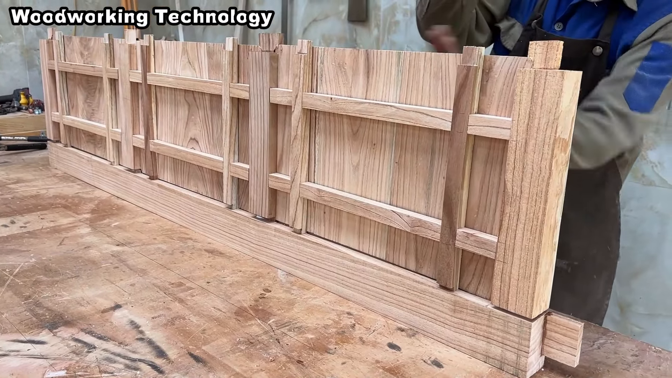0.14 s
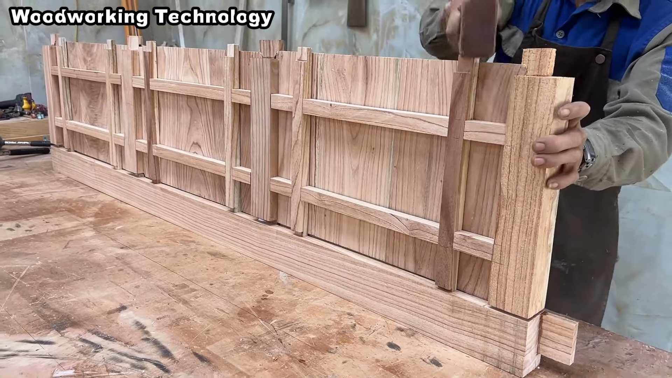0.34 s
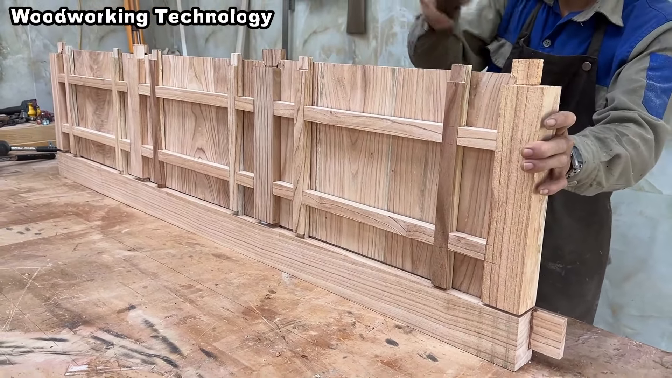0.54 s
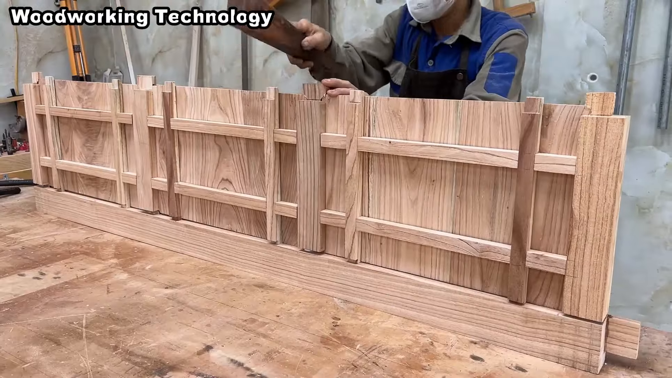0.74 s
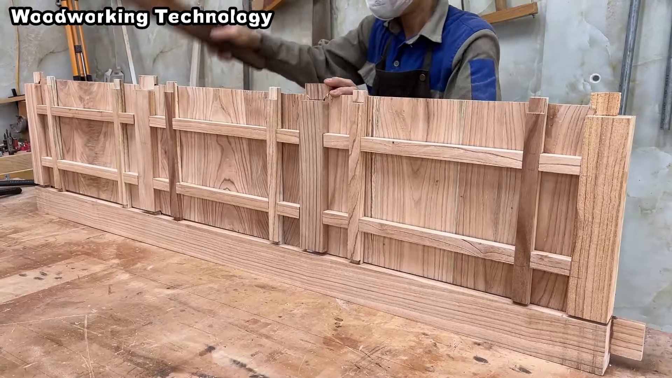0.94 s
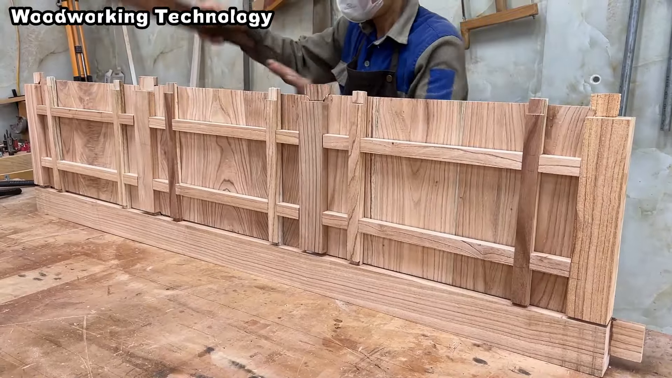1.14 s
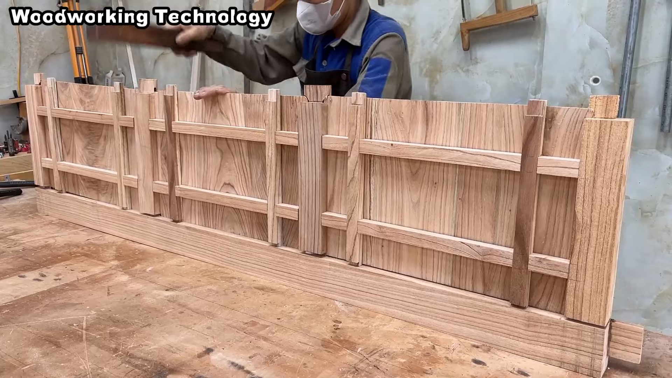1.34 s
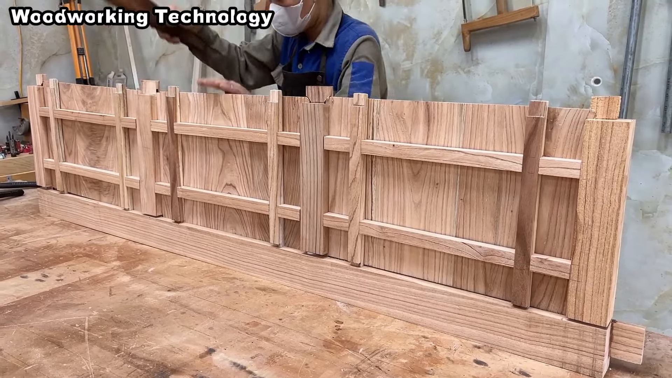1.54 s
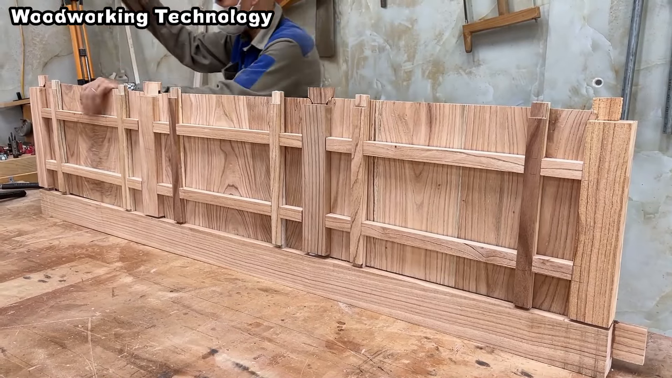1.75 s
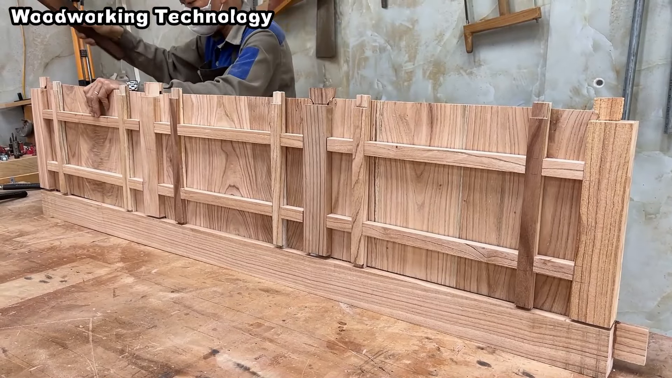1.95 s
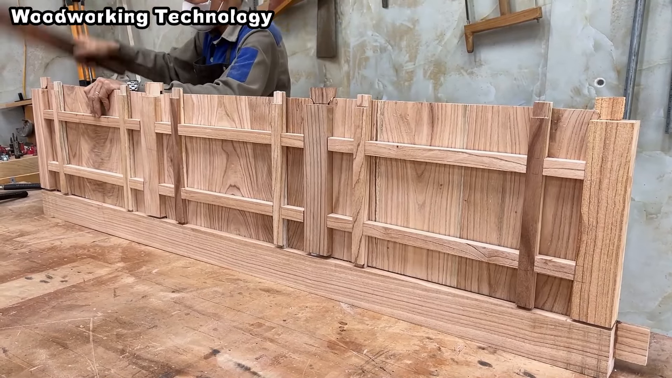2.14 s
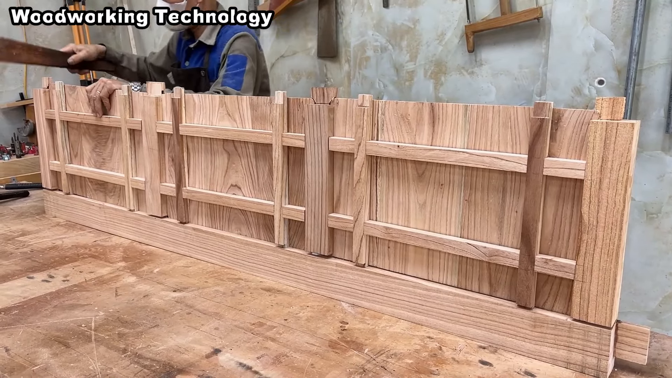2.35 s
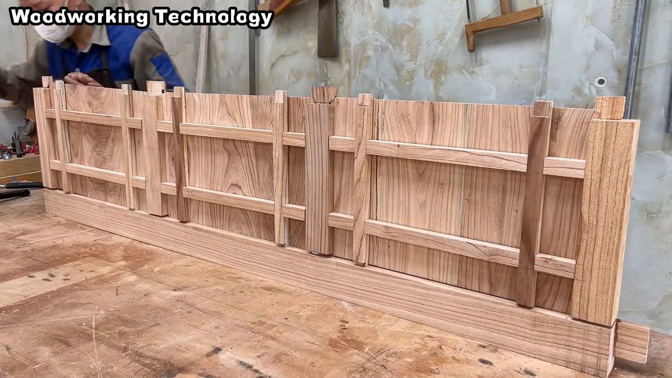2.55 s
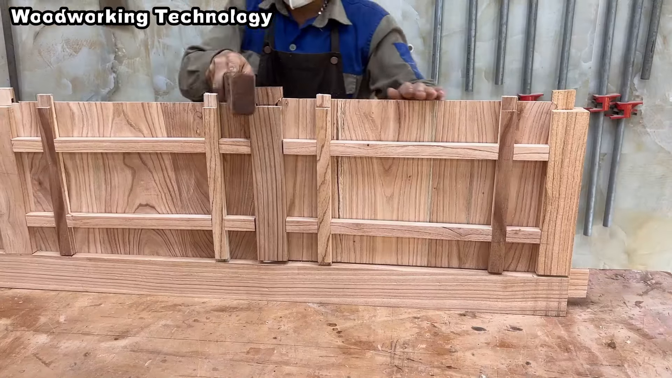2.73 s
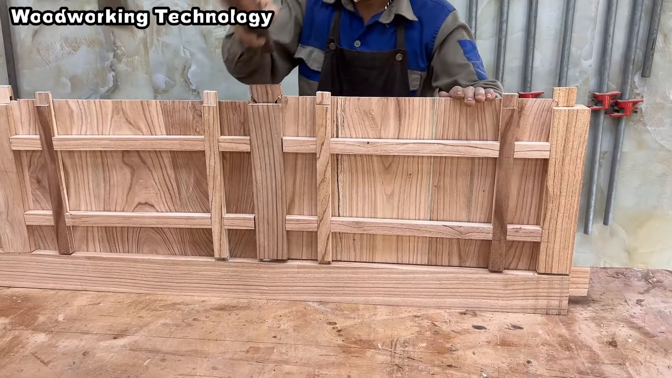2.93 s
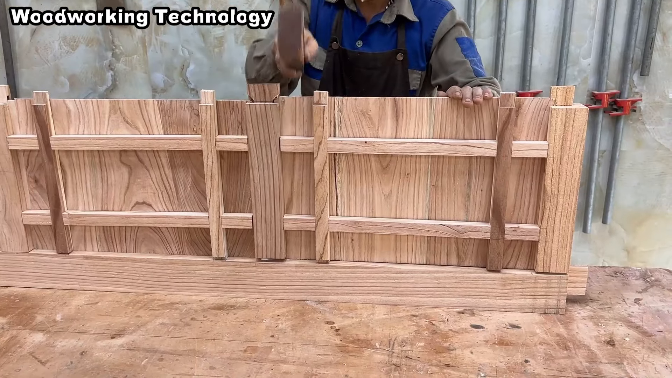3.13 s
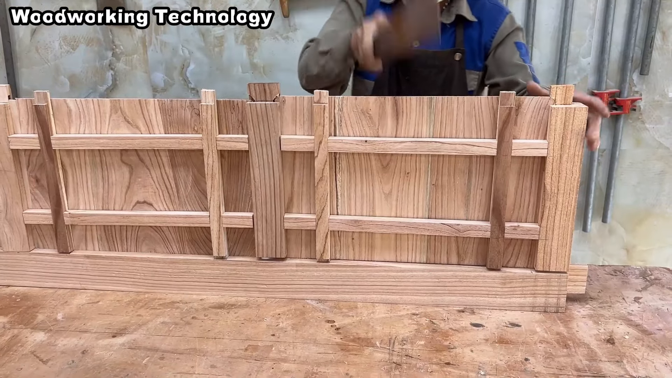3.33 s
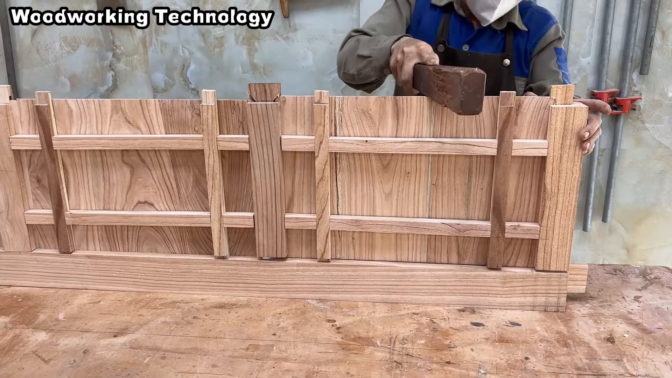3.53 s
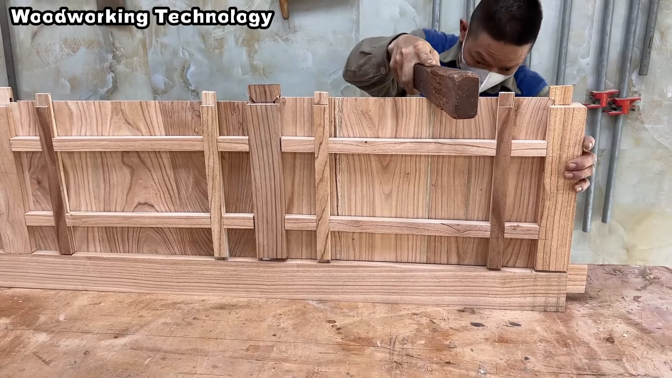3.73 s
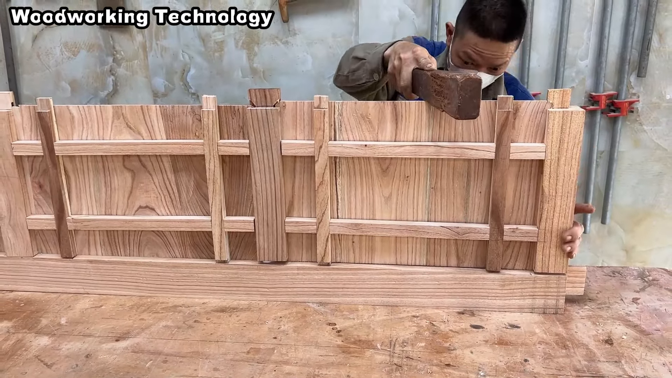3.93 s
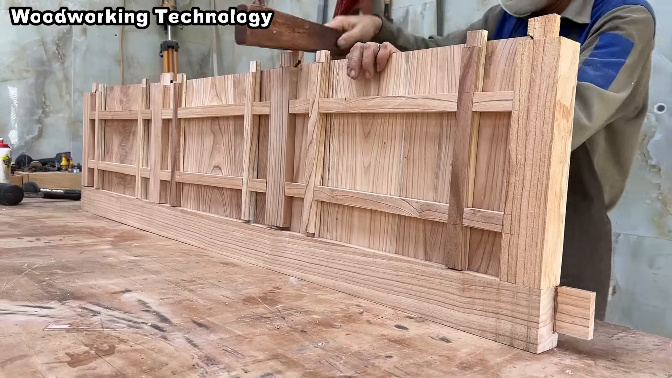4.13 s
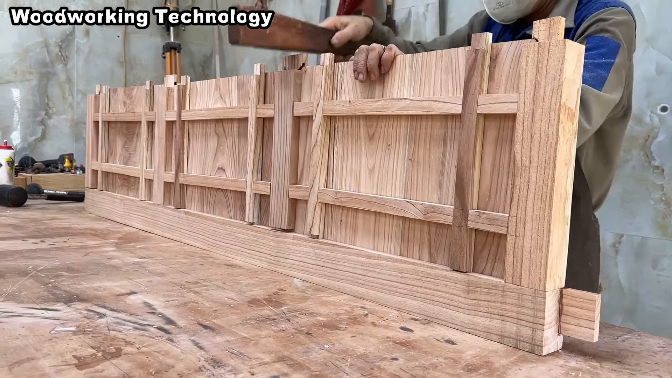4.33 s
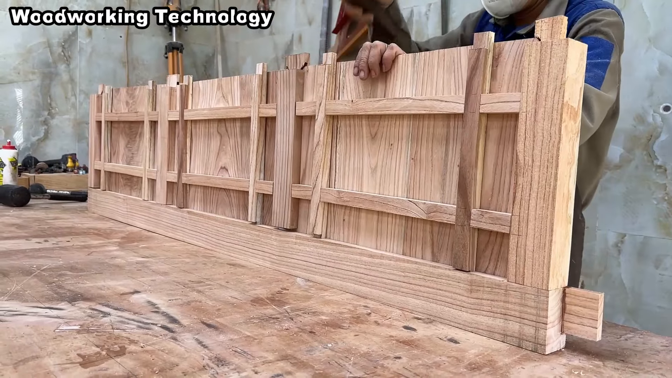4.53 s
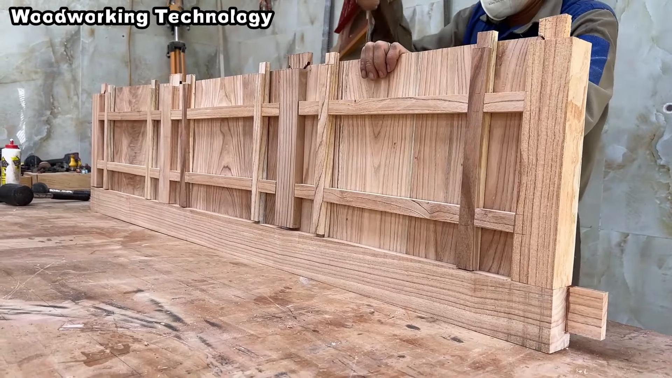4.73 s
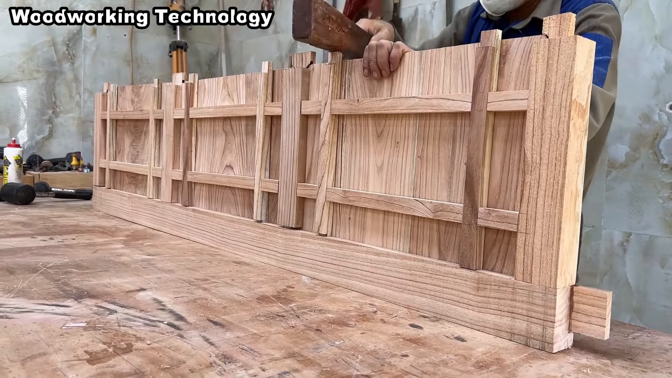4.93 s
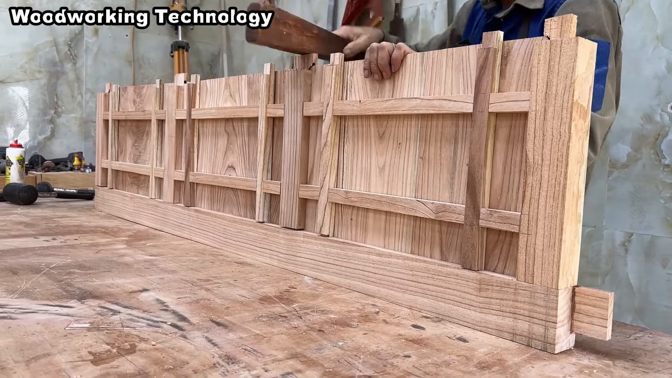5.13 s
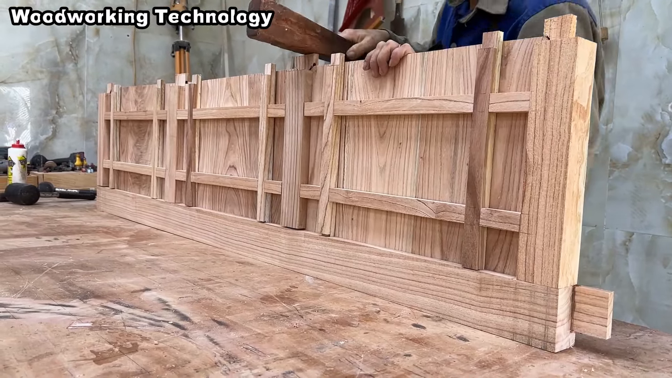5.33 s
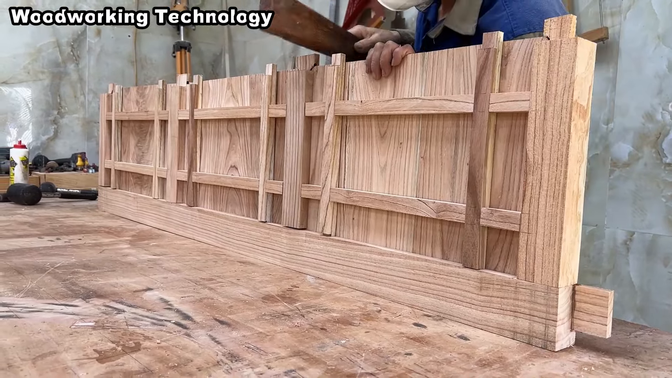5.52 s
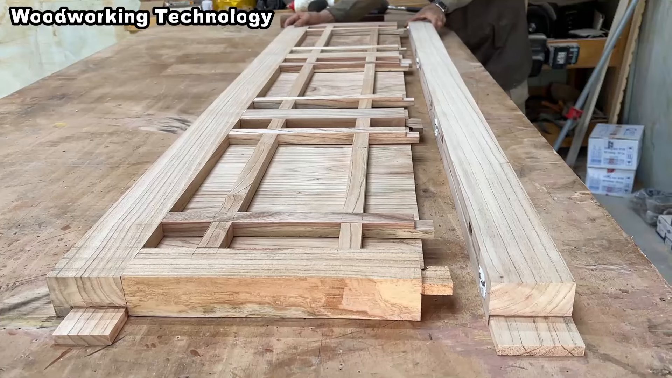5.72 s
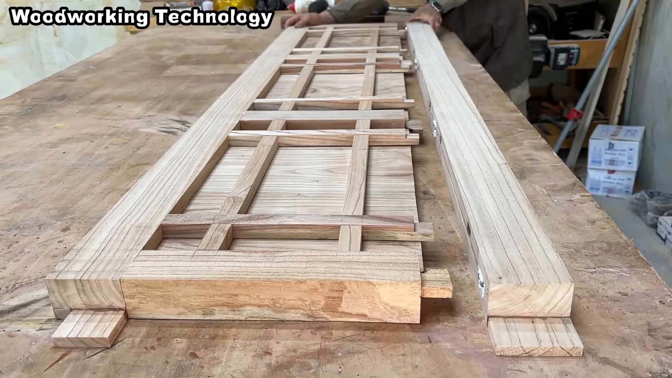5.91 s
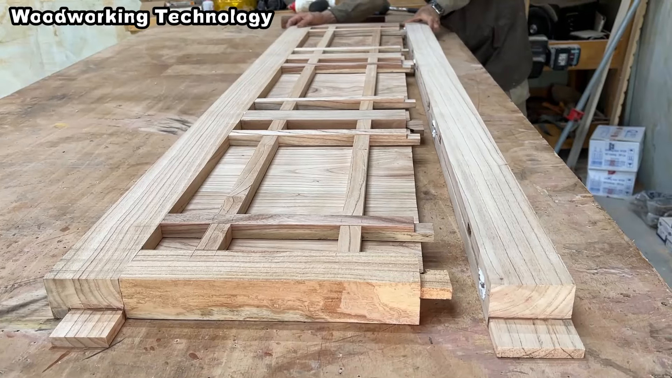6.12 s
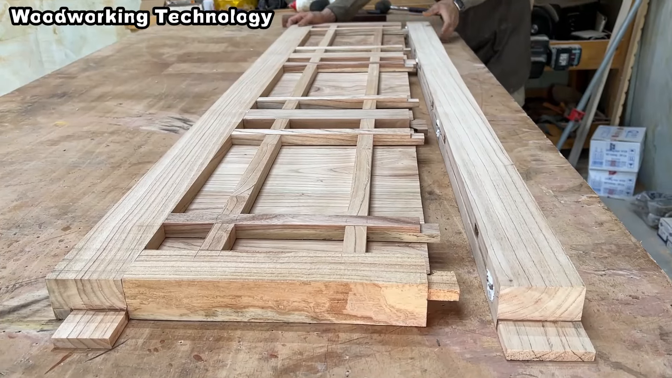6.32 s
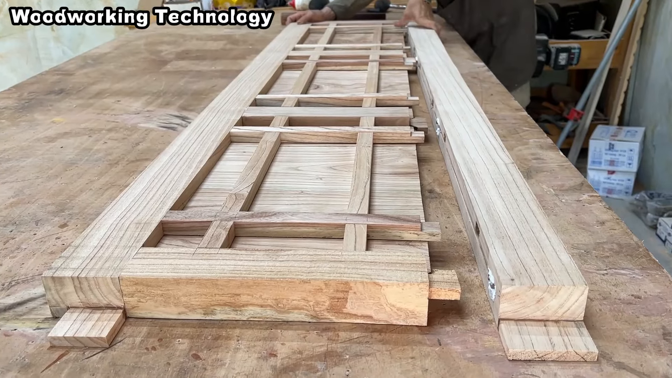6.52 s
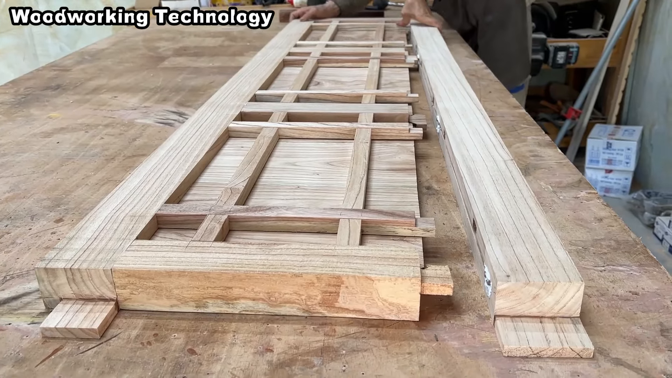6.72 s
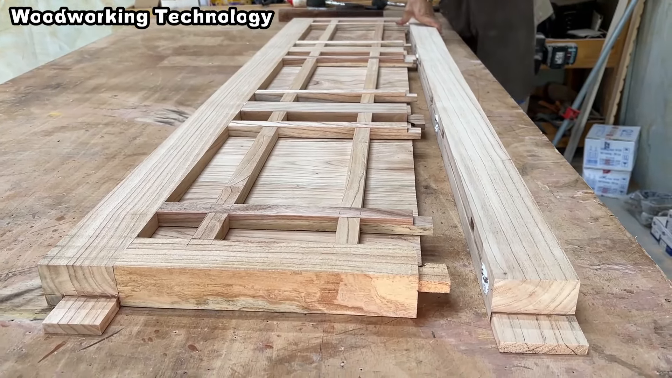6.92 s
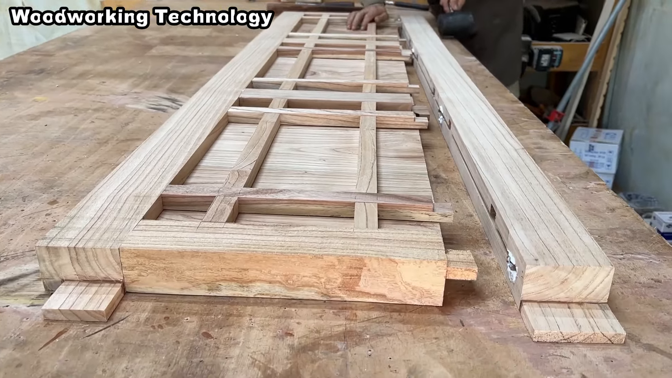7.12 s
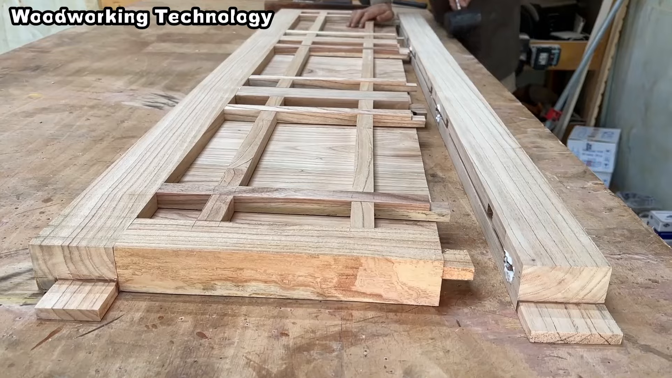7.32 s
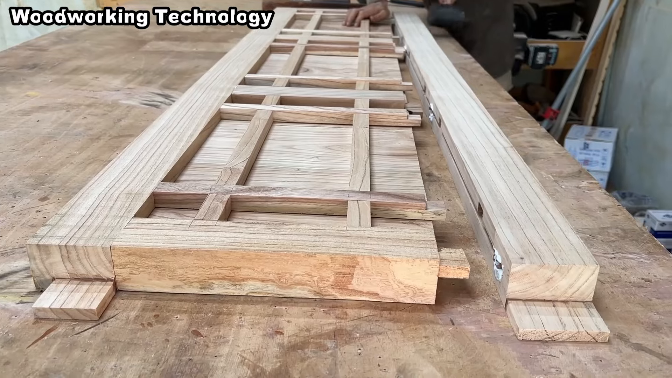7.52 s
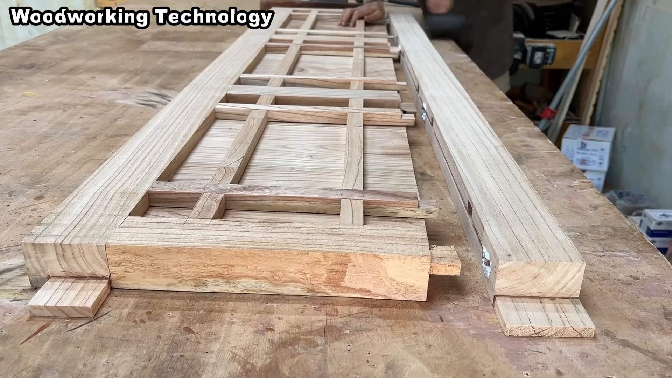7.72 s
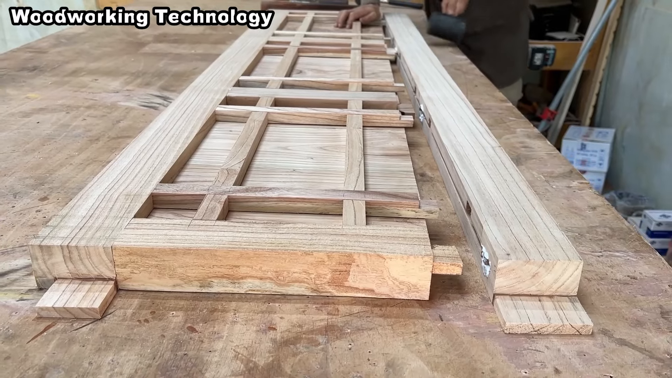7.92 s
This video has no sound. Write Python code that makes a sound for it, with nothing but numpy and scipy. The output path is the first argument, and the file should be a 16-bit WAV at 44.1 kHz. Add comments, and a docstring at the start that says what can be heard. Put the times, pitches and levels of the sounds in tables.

```python
"""A small workshop, where a joiner drives a panelled frame's joints home with quick runs of a rubber mallet.
Each blow cracks, spreads as bending waves, rings the frame's modes, thumps the wood back onto the bench
and dies away between the walls. A joint with play rattles and buzzes; a seated one cracks cleanly.
Around the blows: low shop air, soft brushes and ticks, a snap, a squeak and faint clinks. Later the frame
lies flat, a machine hums, and lighter taps lead to three hard, hollow blows on a loose rail."""
import sys
import numpy as np
from scipy import signal
from scipy.fft import rfft, irfft
from scipy.io import wavfile

SR = 44100
rng = np.random.default_rng(int(sys.argv[2]) if len(sys.argv) > 2 else 0)


def transcribe(signal):
    """Save signal, clipped to [-1, 1], as a 16-bit WAV file at the path in sys.argv[1]."""
    frames = np.atleast_2d(signal).T
    limited = np.clip(frames, -1, 1)
    pcm = np.round(limited * 32767).astype(np.int16)
    wavfile.write(sys.argv[1], SR, pcm)


N = 351036
LENGTH = 19200  # samples in one short sound
AGE, TIME = np.arange(LENGTH) / SR, np.arange(N) / SR

# Room tone of the quiet shop. Each row: frequency in Hz, spectral level in dB.
SHOP_COLOUR = [(30, -36), (70, -20), (115, -2), (220, 0), (400, -15), (800, -25), (2000, -34), (4000, -41),
               (11000, -47), (15000, -52)]
# Rush of the running machine. Each row: frequency in Hz, spectral level in dB.
MACHINE_COLOUR = [(30, -42), (78, -32), (100, -8), (150, -3), (200, -8), (300, -11), (420, -13), (700, -18),
                  (1500, -23.5), (3000, -31), (6000, -37), (12000, -40), (15500, -46)]
# The machine's hum. Each row: pitch in Hz, level in dB, slow waver as a share of the level.
HUM_TONES = [(103.5, -54, .5), (129.2, -62, .5), (240.5, -47.5, .06), (290, -55, .15), (375, -67, .4),
             (412, -67, .4)]
# Brief dips of the background. Each entry: time in seconds.
DIP_TIMES = [2.79, 4.136, 5.709, 7.141]
# Stereo spread of the close sound. Each row: frequency in Hz, side over mid in dB.
NEAR_WIDTH = [(120, -18.5), (350, -15), (700, -11), (1300, -7), (2500, -4.5), (4400, 0), (9000, 0)]
# Stereo spread of the room. Each row: frequency in Hz, side over mid in dB.
ROOM_WIDTH = [(120, -25), (350, -12.5), (700, -9), (1300, -5), (2500, -2.5), (4400, 0.5), (9000, -1)]
# The workshop's reverb. Each row: frequency in Hz, time to fall 60 dB (t60) in seconds.
ROOM_T60 = [(120, .6), (400, 0.41), (1500, 0.42), (4000, 0.37), (8000, 0.36), (14000, 0.25)]

# Soft brushing sounds and small ticks, with one sharp click just before the hum starts.
# Each row: start in seconds, length in seconds, level in dB.
BRUSHES = [(0.413, 0.015, -46.5), (3.753, 0.071, -49.5), (4.099, 0.025, -63), (5.69, 0.0047, -34),
           (5.736, 0.1, -57), (6.513, 0.44, -62.5), (6.556, 0.008, -52), (6.827, 0.025, -39),
           (6.847, 0.064, -45.5), (6.933, 0.042, -45), (7.201, 0.015, -48), (7.249, 0.096, -56),
           (7.349, 0.029, -50), (7.418, 0.059, -51.5)]
# Tone of the brushes and ticks. Each row: frequency in Hz, spectral level in dB.
BRUSH_COLOUR = [(200, -4), (800, 6.5), (3000, -2.5), (6000, -9), (11000, -14), (15500, -16)]
# Faint metal clinks. Each row: start in seconds, pitch in Hz, level in dB, t60 in seconds.
CLINKS = [(3.93, 2120, -71, 0.24), (3.973, 2820, -57.5, 0.14)]
# Something loose on the bench. Each row: pitch in Hz, level in dB, t60 in seconds.
JINGLE_MODES = [(2616, -35, .2), (3020, -43, .17), (3601, -50, .22), (4237, -43, .17), (4727, -48, .22)]
# Tone of the one dry, bright snap. Each row: frequency in Hz, spectral level in dB.
SNAP_COLOUR = [(150, -26), (450, -8), (1100, 2), (1550, -10), (3000, 5), (4500, -9), (6300, -3),
               (9000, -12), (14000, -18)]

# The mallet blows. Each row: start in seconds, force in dB, hardness in dB per octave, play in the joint
# from 0 to 1, crack over rattle in dB, crack pitch in Hz, knock pitch in Hz, delay until the wood lands
# on the bench in seconds, landing level in dB.
BLOWS = [(0.0159, -1.5, -0.6, 0.04, 10.5, 2600, 223, .0095, 4),
         (0.1644, 0, -0.67, 0.12, 12.5, 2480, 227, .0096, 6),
         (0.471, -1, 0.03, 0.39, 12.5, 2500, 720, .0095, 0.5),
         (0.6108, 0.5, -0.5, 0.09, 12.5, 4200, 750, .0096, 6),
         (0.8333, -10.5, 0.2, 0.8, -10, 2330, 250, .002, 0),
         (0.9393, -4.5, 1, 0.23, 13.5, 1340, 530, .0102, 2),
         (1.1278, -5.5, 0.2, 0.72, 0.5, 3970, 780, .006, 1),
         (1.226, -6.5, 0.1, 0.24, 15, 3740, 417, .0087, -2),
         (1.4321, -4.5, 1.64, 0.4, -4, 3420, 217, .0084, -0.5),
         (1.6139, -3, 1.45, 0, 13.5, 1520, 1030, .0071, 5), (1.9859, 2, -1.83, 0.5, 5, 1460, 750, .0067, 1),
         (2.141, 2.5, -1.9, 0.37, 10, 1555, 224, .006, 0),
         (2.3127, 2.5, -1.56, 0.31, 12, 1520, 227, .006, -1.5),
         (2.4324, 0, -2.5, 0, 14.5, 2650, 233, .0069, 5.5),
         (2.8639, -5.5, 1.5, 0.29, 5, 2520, 639, .0047, 2.5),
         (2.982, -6.5, 0.6, 0.03, 14.5, 1940, 246, .0063, 2.5),
         (3.1891, -1, -1.3, 0.38, 11.5, 2710, 250, .0088, 0),
         (3.3052, 2, -3, 0, 13.5, 1840, 606, .0079, 4.5), (3.4943, 3.5, -2, .3, 12.5, 2490, 850, .0078, -2),
         (3.64, 0.5, -2.5, 0.23, 12.5, 2540, 783, .0141, -1),
         (4.25, 1.5, -2.2, 0.72, -5.5, 2404, 243, .0058, -1),
         (4.4434, 0, -2.16, 0.72, -5, 1360, 612, .0079, -8),
         (4.5887, 1, -2.5, 0.47, 7.5, 1330, 610, .0076, -4),
         (4.7851, -4, 0.07, 0.61, 3, 1450, 614, .0055, 1.5),
         (4.94, -5, 0.27, 0.67, -1.5, 2750, 586, .006, -5),
         (5.0513, -4.5, -0.1, .1, 11, 1110, 610, .004, 2.5),
         (5.2599, 1.5, -2.2, 0.74, 1, 2500, 236, .0076, -3),
         (5.4124, 1, -2, 0.48, 10, 1426, 252, .0058, -1), (6.023, -23, -9.5, 1, 6, 1136, 332, .012, 2),
         (6.2731, 0.5, -7.5, 0.2, 9, 1350, 770, .004, 3), (6.7216, -3, -5, 0.02, 7.5, 1280, 860, .0141, -2),
         (7.18, -16.5, -9, .5, -6, 400, 262, .012, 7), (7.328, -19, -9.5, .5, -6, 400, 270, .014, 7),
         (7.6131, 5.5, -3, .09, 13.5, 1290, 695, .024, -1),
         (7.7635, 2.5, -3, 0.02, 9.5, 1350, 710, .0245, -5),
         (7.896, 3.5, -3, 0.02, 12, 1450, 810, .025, -1.5)]
# Where the mallet works. Each row: start in seconds, spot number. Spots 0 to 8 are right end, middle,
# left end, centre post, right panel, rib, top rail, frame lying flat and loose rail.
SPOTS = [(0, 0), (.7, 1), (1.8, 2), (2.7, 3), (3.1, 4), (4.1, 5), (4.7, 6), (5.15, 5), (5.7, 7), (7.5, 8)]
FLAT_SPOT, RAIL_SPOT = 7, 8
# How well a spot drives frame and bench. Each row, one per spot: boom in dB, knock in dB.
SPOT_BODY_DB = [(8.5, 1.5), (11.5, 4.5), (3.5, 0.9), (8.5, 2), (-4, -3.5), (-4.5, -3), (5.5, 8.5),
                (-13.5, -4), (-12.5, -2.5)]
# Wood ringing on near a spot. Each row, one per spot: pitch in Hz, lift of the room's tail in dB.
SPOT_RING = [(2500, 8), (2650, 5), (2450, 7), (2505, 7), (1800, 7), (2520, 8), (610, 3), (840, 5),
             (2020, 6)]
# Treble cutoff of the blows; lower sounds duller. Each entry, one per spot: cutoff in Hz.
SPOT_TOP_HZ = [14000, 13500, 15000, 15000, 11500, 14000, 14000, 9000, 12000]
# The frame's modes. Each row: pitch in Hz, then a level in dB for each of spots 0 to 7.
FRAME_MODES = [(136, -14.5, -11.5, -13, 4.5, -18.5, -8.5, -12, -10.5),
               (148, -22, -32, -31.5, -10, -28, -11.5, -15, -10.5),
               (185, -13, -15, -22.5, -8, -43, -42, -11, -14),
               (242, -9, -10, -3.5, -3.5, -8, -10.5, -14, -12),
               (281.8, -10, -9.5, -20, -28, -6, -13.5, -12.5, -21),
               (357.2, -31, -9.5, -14, -38.5, -14.5, -9.5, -18.5, -11.5),
               (405.3, -18, -11, -33, -18, -14.5, -14, -59, -28),
               (465, -10, -12.5, -45, -10, -15, -19.5, -12, -20),
               (552, -35.5, -15.5, -27, -27, -18.5, -19, -12.5, -25),
               (603, -11, -12, -19, -15.5, -9, -11.5, -13, -20),
               (662.7, -12.5, -14.5, -5.5, -17.5, -22, -17, -21, -11),
               (730, -11.5, -20.5, -3, -25.5, -22, -24, -13, -10),
               (773, -17, -12.5, -37, -37, -10.5, -18, -29, -14),
               (835, -23, -18, -30.5, -14, -18, -21, -41, -12),
               (944, -39, -9.5, -9.5, -9.5, -19.5, -21.5, -20, -8.5),
               (1040, -39.5, -9.5, -27, -24.5, -50, -16, -13.5, -44.5),
               (1264, -14, -11, -11, -12.5, -55, -12, -9, -3),
               (1383, -11, -21, -32.5, -7.5, -30.5, -12, -13, -4),
               (1478, -23.5, -17, -34.5, -13.5, -25, -15, -12.5, -9),
               (1553, -25.5, -20.5, -11.5, -38, -47, -26, -35, -8),
               (1717, -13.5, -11, -42, -18.5, -7.5, -13.5, -13, -22),
               (1855, -28, -12.5, -13, -23, -10, -13, -19, -32),
               (2002, -20, -23, -27, -19, -18.5, -16.5, -15, -19),
               (2450, -15, -16.5, -11, -12.5, -30, -14.5, -34, -21.5),
               (2490, -27.5, -30.5, -12.5, -10, -25, -14.5, -29, -12),
               (2744, -15, -20, -18.5, -20.5, -34.5, -18, -16, -15),
               (2800, -21, -21, -35, -19, -13.5, -61, -35, -73),
               (5370, -30.5, -31.5, -21, -34.5, -33, -26.5, -35, -27)]
# Hand and bench damp the middle modes most. Each row: frequency in Hz, t60 in seconds.
MODE_T60 = [(130, .18), (200, .12), (420, .115), (580, .15), (750, .12), (1500, .14), (2600, .15)]
# The loose rail's modes. Each row: pitch in Hz, level in dB, t60 in seconds.
RAIL_MODES = [(165.6, -8, 0.13), (364, -12.5, 0.15), (555, -12, 0.089), (719, -7.5, 0.035),
              (865, -5.5, 0.088), (948, -10, 0.11), (1144, -13, 0.067), (1310, -6.5, 0.044),
              (1566, -4, 0.056), (2060, -6, 0.095), (2710, -8.5, 0.054)]
# The weaker part of a mode that lingers. Each row: frequency in Hz, level against the mode in dB.
LINGER = [(700, -18), (1800, -14.5), (2600, -19)]
# Woody tone of the crowd of weaker modes. Each row: frequency in Hz, spectral level in dB.
WOOD_COLOUR = [(30, -46.5), (65, -29.5), (95, -7.5), (130, 3.5), (250, 3.5), (450, 2), (750, 2),
               (1500, 0.5), (2600, -2.5), (3600, -7), (5500, -11.5), (7000, -17.5), (11000, -24.5),
               (15500, -29.5)]
# Tone of the first crack. Each row: frequency in Hz, gain in dB.
CRACK_COLOUR = [(150, -9), (500, -12), (1000, -6), (2000, -4), (4000, -8.5), (10000, -16)]
# Decay of the rattling frame. Each row: frequency in Hz, t60 in seconds.
RATTLE_T60 = [(120, 0.26), (300, 0.32), (800, 0.2), (2000, 0.2), (5000, 0.2), (12000, 0.15)]
# Tone of wood landing on the bench. Each row: frequency in Hz, spectral level in dB.
THUMP_COLOUR = [(50, -32), (85, -13), (130, 1), (230, 5.5), (600, 1), (1500, -10), (5000, -33),
                (14000, -62)]
# The bench smothers the bass of wood lying on it. Each row: frequency in Hz, gain in dB.
LYING_DAMPING = [(60, -8), (115, -11), (175, 0)]
# A blow's five zones: boom, knock, clack, snap and fizz. Each entry: a band edge in Hz.
ZONE_EDGES_HZ = [80, 350, 1100, 3200, 8000, 16000]
# Base balance of a blow on a seated joint. Each entry, one per zone: level in dB.
SEATED_DB = [-37, -26, -23, -30.5, -41.5]
# Full play trades clack for thump and buzz. Each entry, one per zone: level change in dB.
PLAY_DB = [2.5, -2.5, -5, 3.7, 12]
ZONE_CENTRES_HZ = np.sqrt(np.multiply(ZONE_EDGES_HZ[1:], ZONE_EDGES_HZ[:-1]))


def undb(db):
    """Decibels to gain."""
    return 10 ** (np.asarray(db) / 20)


def along(points, hz):
    """Read (Hz, value) points on a log-frequency axis."""
    point_hz, value = np.transpose(points)
    return np.interp(np.log(np.maximum(hz, 1)), np.log(point_hz), value)


def freqs(x):
    """Frequencies of the spectrum of x."""
    return np.fft.rfftfreq(x.shape[-1], 1 / SR)


def causal(db):
    """Minimum-phase response with these levels: it rings only after it is struck."""
    cepstrum = irfft(db * np.log(10) / 20)
    half = len(cepstrum) // 2
    cepstrum[1:half] *= 2
    cepstrum[half + 1:] = 0
    return np.exp(rfft(cepstrum))


def colour(x, points):
    """Equalise by (Hz, dB) points."""
    return irfft(rfft(x) * causal(along(points, freqs(x))), x.shape[-1])


def resonance(x, hz, db, octaves=0.18):
    """A bell-shaped boost: the wood favours one pitch."""
    distance = np.log2(np.maximum(freqs(x), 1) / hz) / octaves
    return irfft(rfft(x) * causal(db * np.exp(-distance ** 2)))


def stereo(pair, width):
    """Left and right from a mid and a side signal."""
    side = colour(pair[1], width)
    return np.array([pair[0] + side, pair[0] - side])


def unit(x):
    """Scale each row to energy 1."""
    return x / np.sqrt(np.sum(x ** 2, axis=-1, keepdims=True))


def fade(t60):
    """Exponential decay, 60 dB down after t60 seconds."""
    return np.exp(-np.log(1000) * AGE / np.maximum(t60, 1e-4))


def add(out, start_s, x, fade_s=.1):
    """Mix x into out at start_s, fading its end."""
    i = max(int(start_s * SR), 0)
    x = x * np.clip((AGE[-1] - AGE) / fade_s, 0, 1) ** 2
    out[:, i:i + x.shape[-1]] += x[..., :N - i]


def burst(length_s):
    """A tiny burst of grit, mid and side."""
    return unit(rng.standard_normal((2, LENGTH)) * np.exp(-(AGE / length_s) ** 2))


def dying_noise(t60s):
    """A mid and a side noise whose bands each die at their own rate."""
    spectrum, out = rfft(rng.standard_normal((2, LENGTH))), 0
    band_hz, band_t60 = np.transpose(t60s)
    for t60, pick in zip(band_t60, np.eye(len(t60s))):
        band = along(np.column_stack([band_hz, pick]), freqs(AGE))
        out = out + irfft(spectrum * band) * fade(t60)
    return unit(out)


def air(points):
    """Steady, coloured stereo noise with a mid of rms 1."""
    pair = colour(rng.standard_normal((2, N)), points)
    return stereo(pair / pair[0].std(), ROOM_WIDTH)


def machine(start_s=5.722, rise_s=0.00098, rush_db=-54):
    """A machine cuts in: an airy rush over hum tones that waver in level and phase."""
    knots, hum = np.linspace(0, TIME[-1], 40), 0
    for hz, db, waver in HUM_TONES:
        swell = np.interp(TIME, knots, waver * rng.standard_normal(len(knots)))
        drift = np.interp(TIME, knots, waver * rng.standard_normal(len(knots)))
        hum = hum + np.sqrt(2) * undb(db) * (1 + swell) * np.sin(2 * np.pi * hz * TIME + 2 * drift)
    running = np.clip((TIME - start_s) / rise_s, 0, 1)
    return running * (hum + undb(rush_db) * air(MACHINE_COLOUR))


def workshop(air_db=-56.5, dip_s=0.0091):
    """The bed: low shop air, later the machine too, with a few brief dips in level."""
    dips = np.prod([1 - np.exp(-((TIME - s) / dip_s) ** 4) for s in DIP_TIMES], axis=0)
    return dips * (undb(air_db) * air(SHOP_COLOUR) + machine())


def brushes(grain_db=6, grain_samples=48, rise_s=0.0028):
    """Swells of grainy noise: the long ones brush softly, the shortest tick or click."""
    out = np.zeros((2, N))
    for start_s, length_s, db in BRUSHES:
        noise = rng.standard_normal((2, LENGTH))
        grain = undb(grain_db * rng.standard_normal(LENGTH // grain_samples).repeat(grain_samples))
        rub = colour(noise * grain, BRUSH_COLOUR)
        swell = (1 - np.exp(-AGE / rise_s)) * np.exp(-(AGE / length_s) ** 2)
        add(out, start_s, stereo(rub / rub.std(), ROOM_WIDTH) * swell * undb(db))
    return out


def clinks():
    """Small bits of metal ping, one dying tone each."""
    out = np.zeros((2, N))
    for start_s, hz, db, t60 in CLINKS:
        add(out, start_s, undb(db) * np.sin(2 * np.pi * hz * AGE) * fade(t60))
    return out


def jingle(start_s=6.724):
    """Something loose on the bench rings briefly, shaken by one tap."""
    out = np.zeros((2, N))
    for hz, db, t60 in JINGLE_MODES:
        phases = rng.uniform(0, 2.8, (2, 1))
        add(out, start_s, undb(db) * np.sin(2 * np.pi * hz * AGE + phases) * fade(t60))
    return out


def squeak(start_s=3.762, start_hz=562, sag_hz_per_s=2320, db=-41.5, overtone_db=-8):
    """Wood sticks and slips in a tight joint, its pitch sagging as it settles."""
    corners = start_s + np.cumsum([0, 0.012, 0.016, 0.029])  # attack, hold and release in seconds
    hz = start_hz - sag_hz_per_s * (np.clip(TIME, start_s, corners[-1]) - start_s)
    phase = 2 * np.pi * np.cumsum(hz) / SR
    tone = sum(undb(overtone_db * k) * np.sin((k + 1) * phase) for k in range(3))
    return tone * undb(db) * np.interp(TIME, corners, [0, 1, 1, 0])


def bend(x, lag_at_1khz_s=0.001002, slope=0.8, lowest_hz=110):
    """Bending waves are slower at low pitch: the treble arrives first, the boom last."""
    lag = lag_at_1khz_s * (1000 / np.maximum(freqs(x), lowest_hz)) ** slope
    return irfft(rfft(x) * np.exp(-2j * np.pi * np.cumsum(lag) * SR / LENGTH))


def snap(start_s=.8104, energy_db=8, tail_db=-11):
    """One hard, dry, bright crack with a short tail."""
    grit = burst(length_s=.001)
    click = np.array([(AGE == 0) + grit[0] / 2, grit[1]])
    crack = stereo(unit(colour(click, SNAP_COLOUR)), NEAR_WIDTH)
    tail = stereo(unit(colour(dying_noise(RATTLE_T60), SNAP_COLOUR)), ROOM_WIDTH)
    out = np.zeros((2, N))
    add(out, start_s, undb(energy_db) * bend(crack + undb(tail_db) * tail))
    return out


def wood(x):
    """The crowd of weaker modes makes a sound woody, at an average power gain of 1."""
    mean_power = np.mean(undb(along(WOOD_COLOUR, freqs(AGE))) ** 2)
    return colour(x, WOOD_COLOUR) / np.sqrt(mean_power)


def paths(count=7, first_s=.0015, last_s=.011):
    """What one spot passes on: echoes off the frame's ends and the bench, rattle, and the room's tail."""
    echoes = np.zeros((2, LENGTH))
    lags_s = np.linspace(first_s, last_s, count) * rng.uniform(.8, 1.2, (2, count))
    gains = rng.choice([-1, 1], (2, count)) / np.sqrt(1 + np.arange(count))
    np.put_along_axis(echoes, (lags_s * SR).astype(int), gains, axis=1)
    return unit(echoes), dying_noise(RATTLE_T60), dying_noise(ROOM_T60)


def thump():
    """One dull push as the wood lands on the bench, dead centre."""
    push = unit(colour(1. * (AGE == 0), THUMP_COLOUR))
    return np.array([-push, 0 * push])


def chatter(count=6, from_s=.004, to_s=.032, slap_s=.0008, slap_db=7):
    """Envelope of a joint's faces slapping together, most densely just after the blow."""
    jitter, strength = rng.random((count, 2)).T
    starts = from_s * (to_s / from_s) ** ((np.arange(count) + jitter) / count)
    since = AGE - starts[:, None]
    slaps = (since > 0) * np.exp(-abs(since) / slap_s)
    return 1 + undb(slap_db) * strength @ slaps


def modes_at(spot):
    """What rings at a spot. Each row: pitch in Hz, level in dB, t60 in seconds."""
    if spot == RAIL_SPOT:
        return np.array(RAIL_MODES)
    modes = np.array(FRAME_MODES)
    return np.column_stack([modes[:, 0], modes[:, 1 + spot], along(MODE_T60, modes[:, 0])])


def ring(modes, count=3, detune=0.0071, scatter_db=1.5, linger_t60=.33):
    """Modes split into beating partners; grip and joints shift them a little from blow to blow."""
    mode_hz, db, t60 = modes[:, :1], modes[:, 1], modes[:, 2:]
    gain = undb(db + scatter_db * rng.standard_normal(len(modes)))
    grip = 1 + .006 * rng.standard_normal((len(modes), 1))
    spread = np.linspace(-1, 1, count) + rng.uniform(-.5, .5, (len(modes), count))
    hz = mode_hz * grip * (1 + detune * spread)
    partners = np.sin(2 * np.pi * hz[..., None] * AGE).sum(axis=1)  # start together, then drift apart
    linger = undb(along(LINGER, mode_hz)) * fade(linger_t60)
    waves = unit(partners * (fade(t60) + linger))
    return (gain * rng.choice([-1, 1], (2, len(modes)))) @ waves


def contact(echoes, pulse_db=2, echo_db=-5.5):
    """The mallet's clean push and the grit of its contact, repeated by the early echoes."""
    crack = burst(length_s=.0016)
    crack[0, 0] += undb(pulse_db)
    crack = crack + undb(echo_db) * irfft(rfft(crack) * rfft(echoes))
    return colour(unit(crack), CRACK_COLOUR)


def blow(spot, path, play, crack_db, crack_hz, knock_hz, landing_s, landing_db,
         bite_db=7.5, ring_db=4.5, fresh_db=-2, room_db=-9.5, room_build_s=0.0067):
    """One blow in layers: crack, chattering joint, ringing modes, landing on the bench, and room."""
    echoes, rattle, tail = path
    # fresh noise keeps blows on one spot alike but never equal
    rattle = unit((rattle + undb(fresh_db) * dying_noise(RATTLE_T60)) * chatter())
    tail = tail + undb(fresh_db) * dying_noise(ROOM_T60)
    tail = unit(tail * (1 - np.exp(-AGE / room_build_s)))
    crack = wood(resonance(contact(echoes), crack_hz, bite_db))
    rattle = wood(resonance(rattle, crack_hz, bite_db / 2))
    near = bend(undb(crack_db) * crack + rattle + undb(ring_db) * ring(modes_at(spot)))
    if spot == RAIL_SPOT:
        landing = near / undb(crack_db)  # the loose rail sounds again as it lands
    else:
        landing = thump() + play * undb(1) * crack  # a joint with play slaps shut
    near = near + undb(landing_db) * np.roll(landing, int(landing_s * SR), axis=1)
    near = resonance(near, knock_hz, db=4, octaves=.22)
    near = signal.sosfilt(signal.butter(4, SPOT_TOP_HZ[spot], fs=SR, output="sos"), near)
    if spot >= FLAT_SPOT:
        near = colour(near, LYING_DAMPING)
    room = undb(room_db) * bend(wood(resonance(tail, *SPOT_RING[spot], octaves=.11)))
    return stereo(near, NEAR_WIDTH) + stereo(room, ROOM_WIDTH)


def zone_levels(spot, force_db, hardness_db, play, pivot_hz=1000):
    """Force lifts a blow, a hard contact brightens it, play makes it buzz, and the spot sets its body."""
    tilt_db = hardness_db * np.log2(ZONE_CENTRES_HZ / pivot_hz)
    levels = np.array(SEATED_DB) + force_db + tilt_db + play * np.array(PLAY_DB)
    levels[:2] += SPOT_BODY_DB[spot]
    return levels


def balance(x, zones_db, span_s=0.073):
    """Equalise a blow in three passes towards its zone levels, taken as energy spread over span_s."""
    spectrum, hz, db = rfft(x), freqs(x), 0
    for _ in range(3):
        energy = (abs(spectrum.mean(0)) * undb(db)) ** 2 * 2 / LENGTH
        power = np.histogram(hz, ZONE_EDGES_HZ, weights=energy)[0] / (span_s * SR)
        shortfall_db = zones_db - 10 * np.log10(power)
        db = db + along(np.column_stack([ZONE_CENTRES_HZ, shortfall_db]), hz)
    return irfft(spectrum * causal(db))


def mallet():
    """The rubber mallet works from spot to spot, each blow with its own force and hardness."""
    out = np.zeros((2, N))
    path_of = {spot: paths() for _, spot in SPOTS}
    for start_s, force_db, hardness_db, play, *character in BLOWS:
        spot = [spot for from_s, spot in SPOTS if from_s <= start_s][-1]
        sound = blow(spot, path_of[spot], play, *character)
        add(out, start_s, balance(sound, zone_levels(spot, force_db, hardness_db, play)))
    return out


def scene():
    """The mallet up front, small sounds around it and the workshop behind."""
    return mallet() + snap() + jingle() + squeak() + brushes() + clinks() + workshop()


def record(dry, ceiling=0.96, low_cut_hz=80, top_hz=15600):
    """The microphone rounds the highest peaks, thins the deep bass and cuts the top."""
    sound = ceiling * np.tanh(dry / ceiling)
    sound = signal.sosfilt(signal.butter(3, low_cut_hz, "high", fs=SR, output="sos"), sound)
    return signal.sosfilt(signal.ellip(8, .2, 70, top_hz, fs=SR, output="sos"), sound)


dry = scene()
out = record(dry)
transcribe(out)
```